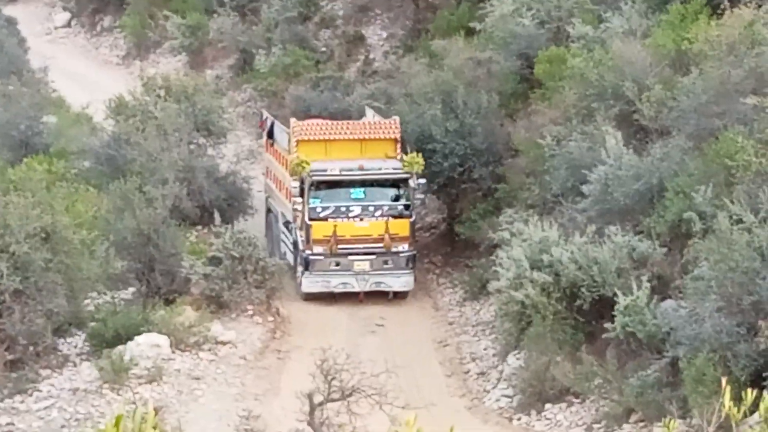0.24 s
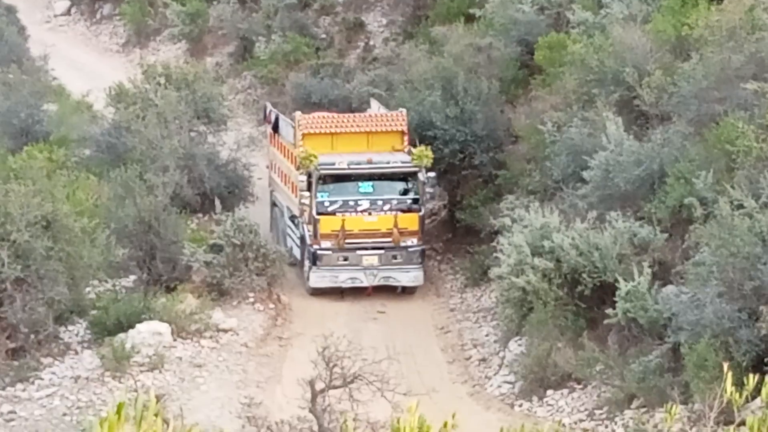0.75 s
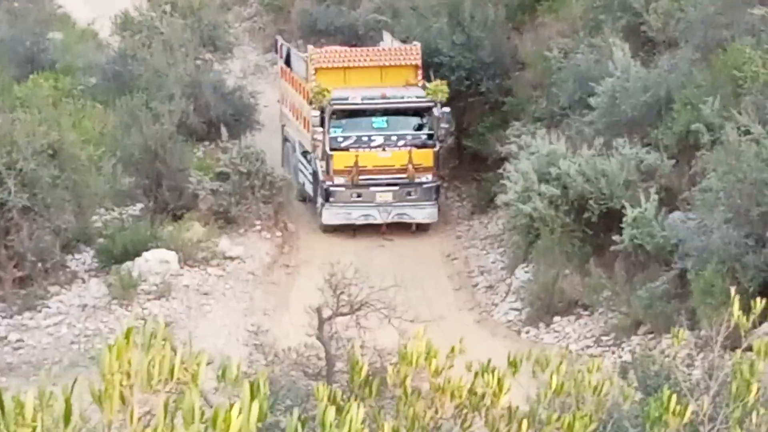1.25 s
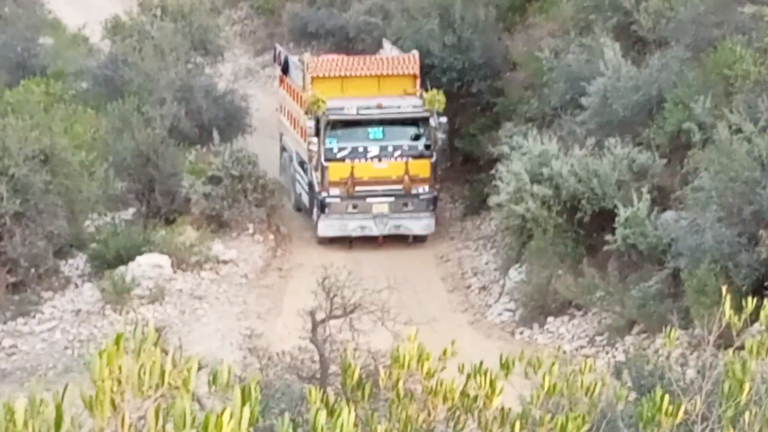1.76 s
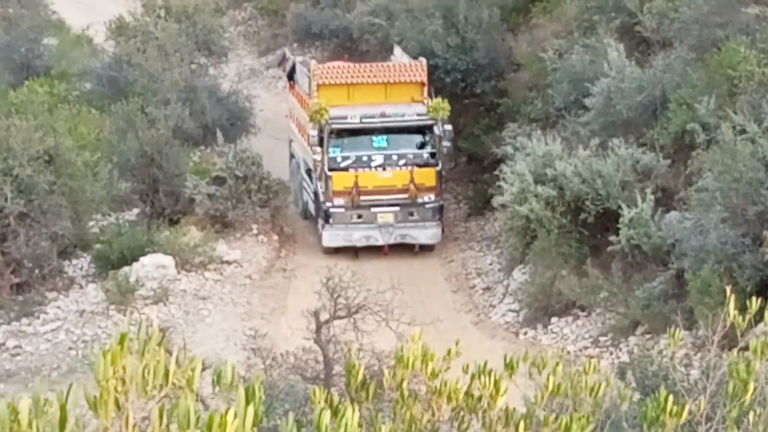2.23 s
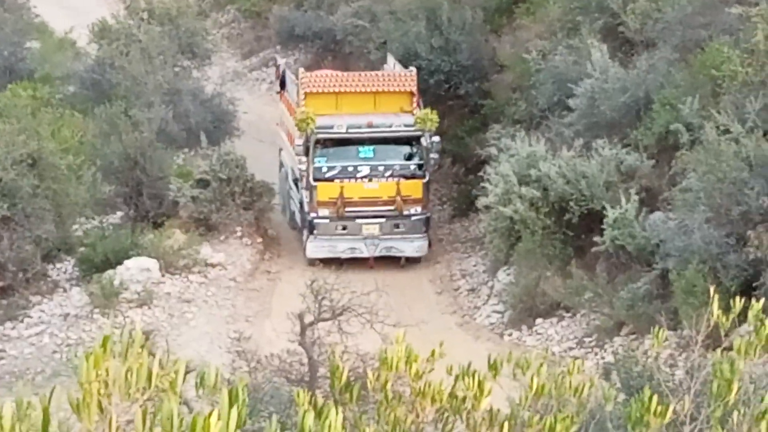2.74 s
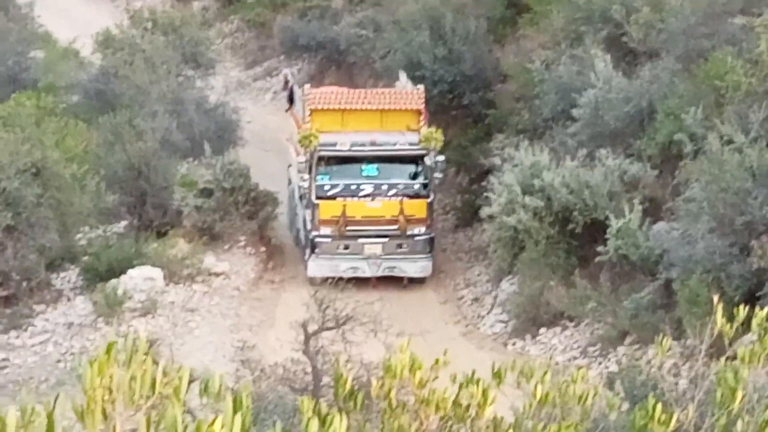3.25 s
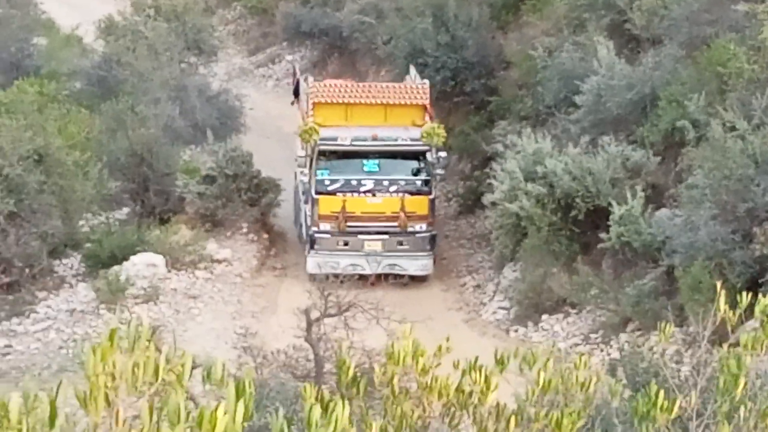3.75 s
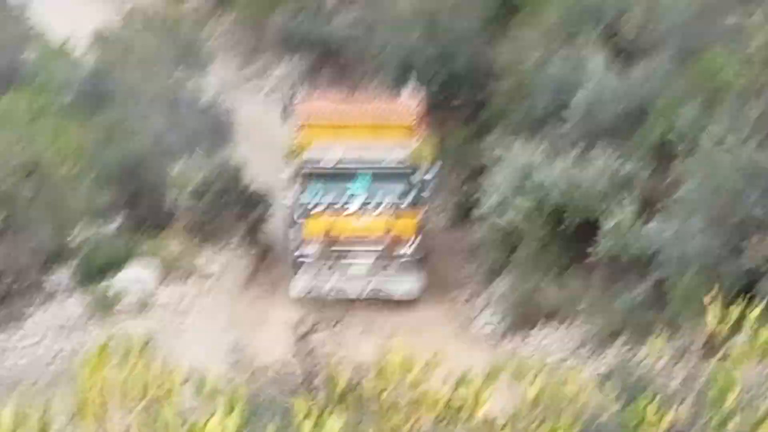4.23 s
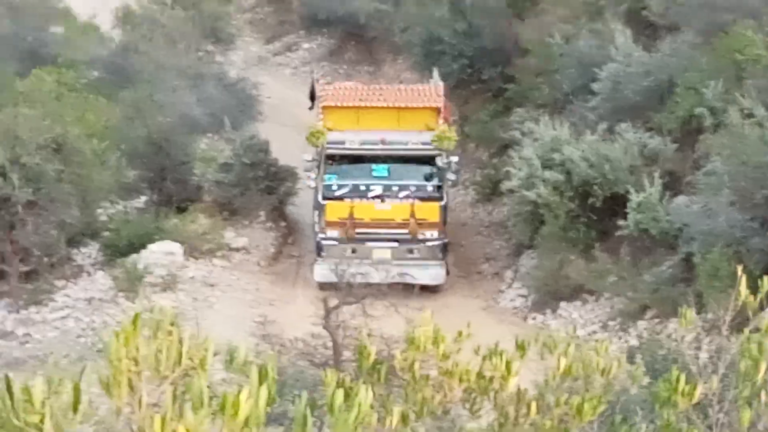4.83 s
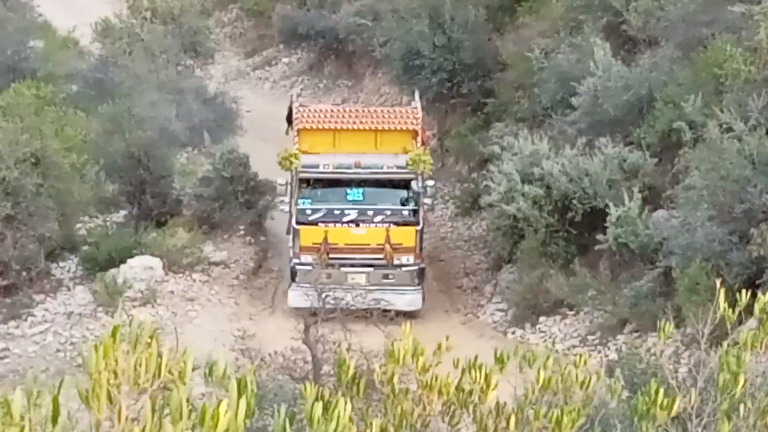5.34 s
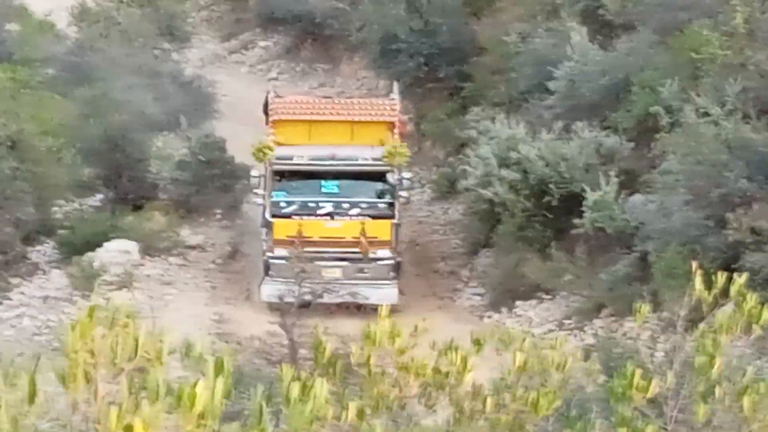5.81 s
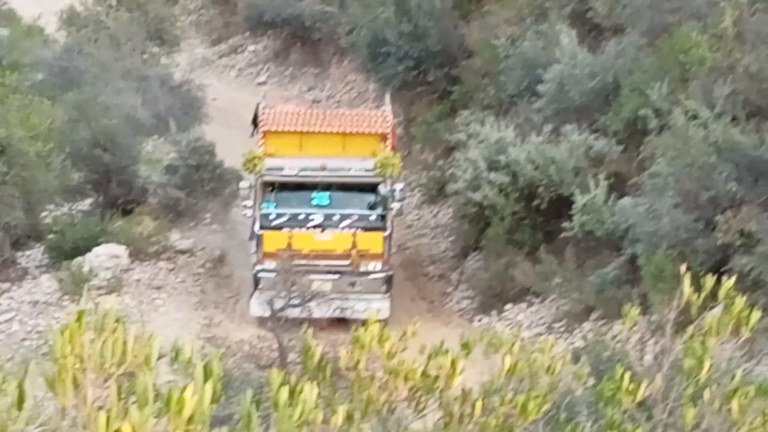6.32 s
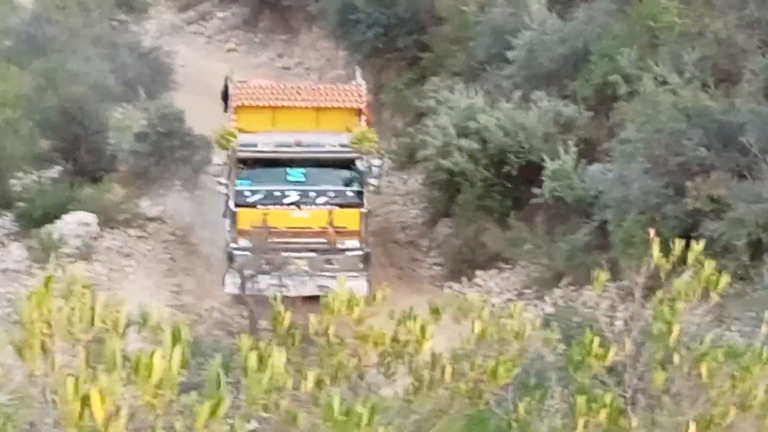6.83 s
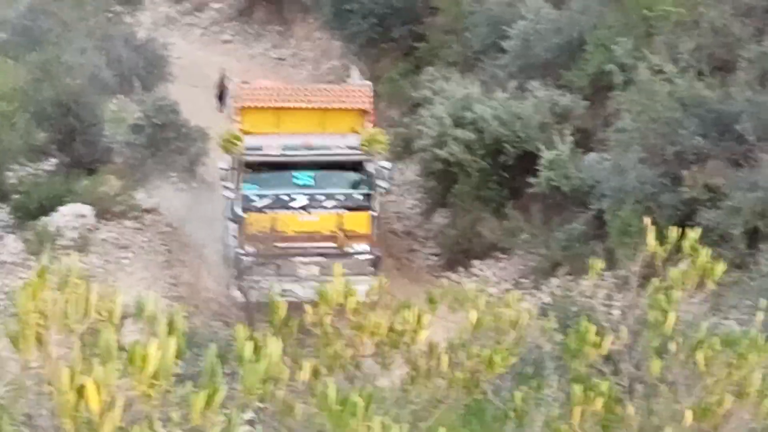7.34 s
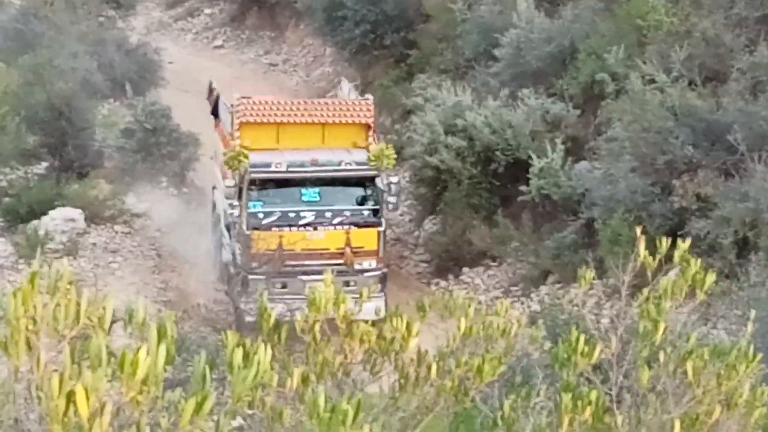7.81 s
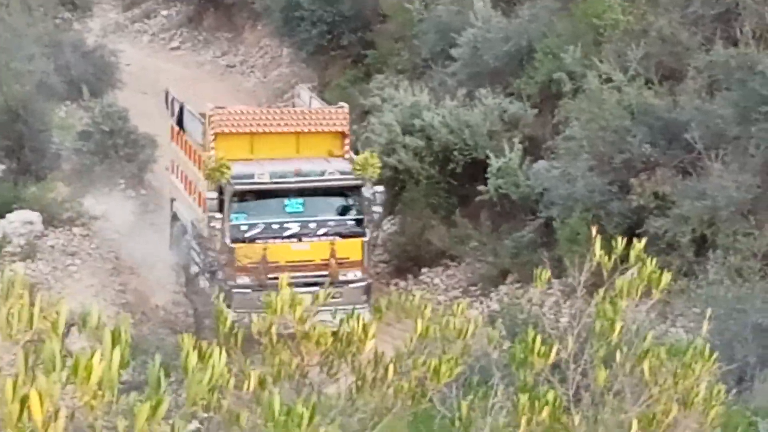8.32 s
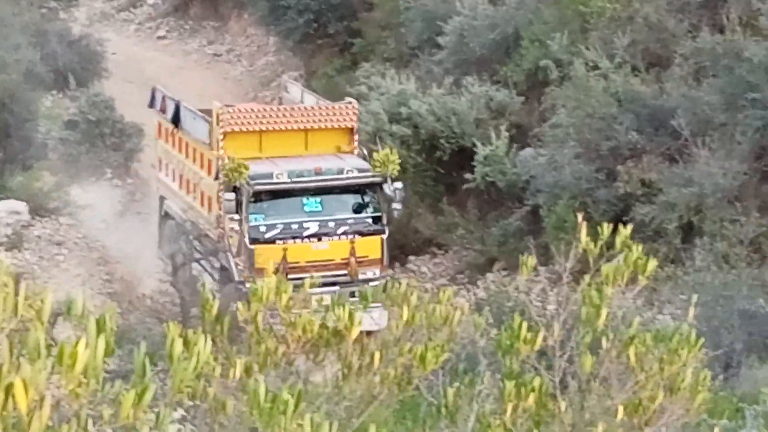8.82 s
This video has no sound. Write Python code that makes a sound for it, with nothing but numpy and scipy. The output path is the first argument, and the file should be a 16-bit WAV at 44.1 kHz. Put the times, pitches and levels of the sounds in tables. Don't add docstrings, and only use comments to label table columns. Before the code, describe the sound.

A phone microphone across a bushy slope catches a steady, throaty truck engine with grainy clatter, faint whine and low ground rumble. Sparse thin bird chirps sit above it. Around the middle the grip changes with a creaking snap and brushing rub, slightly altering the tone of the engine. Dull thumps cluster near the end, followed by two close, brassy horn toots with a brief hillside echo.

```python
import sys
import numpy as np
from scipy import signal
from scipy.fft import rfft, irfft, next_fast_len
from scipy.io import wavfile
from scipy.ndimage import uniform_filter1d, map_coordinates

SR = 44100
rng = np.random.default_rng(int(sys.argv[2]) if len(sys.argv) > 2 else 0)


def voltage_ratio(level):
    return 10 ** (np.asarray(level, float) / 20)


def to_wav(sig):
    pcm = np.clip(np.atleast_2d(sig), -1, 1) * 32767
    pcm = np.round(pcm).astype(np.int16)
    wavfile.write(sys.argv[1], SR, pcm.T)


N = 399987
T = np.arange(N) / SR

# [t/s, firing rate f/Hz, load on upper orders level/dB]
SPEED = [(0, 58.5, -5), (.3, 58.8, -3), (.75, 59.9, 2), (1.1, 59.6, 0), (1.4, 61.3, 1), (2.1, 61.7, 1),
         (2.7, 62.2, 1), (3.2, 61.9, 1), (3.75, 62.6, 1), (4.25, 63.2, 0), (5.7, 63.1, -5), (6.3, 65, -3),
         (6.75, 66.7, 0), (7.6, 66.8, -3), (7.95, 65, -1), (8.2, 61.8, 2), (8.45, 60, 5), (9.07, 59.3, 5)]
# [t/s, level/dB]
NEAR = [(0, -46.5), (.5, -45), (1.2, -44.5), (2, -43), (3.2, -44.5), (4.1, -43.5), (4.6, -44.5),
        (5.8, -43.5), (6.6, -42), (7.3, -40.5), (7.8, -42), (8.8, -42)]
# [mean level/dB, gain per nearness dB/dB, slow drift/dB]
LAYERS = [
    (-47.5, .3, .7),
    (-50, .6, .6),
    (-44, .9, .3),
    (-52, .7, .4),
    (-49, 1.1, 1.2),
]
# [f/Hz, level/dB]
EXHAUST_SPECTRUM = [(71, -47), (120, -6.5), (178, -14.5), (311, -6.5), (394, -13), (664, 2), (900, -12),
                    (1170, -25), (1980, -120)]
# [f/Hz, width/Hz, level/dB]
CAB_MODES = [(650, 80, -2), (695, 36, 3), (728, 22, -4)]
# [f/Hz, level/dB]
BLOCK_SPECTRUM = [(250, -5), (370, -8), (520, -1.5), (700, -14), (839, -9), (1020, -2), (1240, -6),
                  (1330, -3), (1440, -7.5), (1650, -7), (1890, -4), (2150, -12), (2500, -20), (3250, -36),
                  (5500, -120)]
# [f/Hz, level/dB]
CLATTER_SPECTRUM = [(1120, -42), (1900, -3), (2150, -24.5), (2370, -14.5), (3010, -14), (3240, -12.5),
                    (3800, -16), (4660, -16.5), (5710, -16.5), (6700, -14.5), (7520, -23), (8670, -36.5),
                    (11000, -56.5), (14900, -46), (15800, -48)]
SHAFT_ORDERS = [1, 11 / 8, 13 / 8, 2, 17 / 8, 5, 6, 7]
SHAFT_DB = [-54, -56.5, -52, -60.5, -58.5, -58, -58.5, -70]
WHINE_HZ = [1872, 2345]
HORN_HZ = [423.1, 520.6]
HORN_DB = [-21, -27]
LOW_HORN_PARTIALS_DB = [-3, -8, -2, -1.5, 1.5, -12, -7, -5.5, -3.5, -7, -21, -14, -18.5, -12.5]
HIGH_HORN_PARTIALS_DB = [-1.5, -7, -3, 5.5, -5, -2.5, -2, -3, -9, -10, -16, -11, -18, -15]
# [f/Hz, level/dB]
BELL = [(6300, -21), (6800, -24), (7200, -14), (8000, -16), (9300, -33), (12300, -56), (13500, -49),
        (15200, -35)]
# [t/s, held/s, attack/s, level/dB]
TOOTS = [
    (8.87, .109, .006, 1),
    (9.0585, .1, .002, -5),
]
# [f/Hz, t60/s]
HILL_DECAY = [(400, .55), (1300, .3), (2500, .29), (8000, .21)]
# [t/s, comb spacing f/Hz, echo share 0-1]
HAND = [(0, 2120, .45), (4.3, 2120, .45), (4.36, 2120, 0), (4.43, 3800, 0), (4.47, 3150, .62),
        (4.55, 1800, .6), (4.61, 1300, .45), (4.85, 870, .36), (5.1, 810, .33), (6.0, 780, .28),
        (6.42, 820, .33), (6.54, 1100, .33), (6.64, 1480, .36), (7.0, 1820, .38), (7.5, 1960, .36),
        (8.0, 1850, .38), (8.3, 1720, .44), (8.85, 2060, .44)]
# [f/Hz, width/Hz, level/dB]
PORT_MODES = [(6780, 450, -5.5)]
# [f/Hz, level/dB]
SKIN_SPECTRUM = [(1180, -29), (2000, -2), (2160, -11), (2760, -1.5), (3140, -12), (4250, -4), (5010, -15),
                 (6720, 1.5), (8870, -22.5), (14900, -17.5), (15800, -12)]
# [peak t/s, level/dB, 20 dB swell/s, 20 dB fade/s]
STROKES = [
    (4.578, -68, .065, .12),
    (4.872, -46.5, .25, .22),
    (5.07, -57, .6, .04),
    (5.168, -61, .07, .03),
    (6.856, -68.5, .02, .11),
]
# [t/s, bright level/dB, body level/dB]
TICKS = [
    (.678, -52, -60),
    (2.534, -56, -60),
    (4.055, -53, -60),
    (4.3502, -43, -18.5),
    (5.591, -43, -48),
]
# [f/Hz, width/Hz, level/dB]
CASE_MODES = [(3300, 1300, 0), (6500, 1500, -3)]
# [f/Hz, width/Hz, level/dB]
GRIT_MODES = [(7200, 2500, 2), (12500, 7000, 1)]
# [t/s, peak level/dB, f/Hz, t60/s]
BUMPS = [(5.126, -32.5, 125, .12), (7.538, -33.5, 90, 0.14), (7.636, -23.5, 73, 0.12),
         (8.167, -26, 110, 0.07), (8.344, -30, 69.4, .12), (8.386, -16.5, 79.6, 0.078),
         (8.45, -31, 101, .08), (8.515, -32, 127, 0.054), (8.548, -29, 102, 0.057), (8.815, -32, 80, .08),
         (8.845, -30, 95, .07)]
# [t/s, length/s, first f/Hz, last f/Hz, level/dB]
ARCHES = [
    (.074, .038, 4200, 4350, -56),
    (.158, .045, 4300, 4250, -59),
    (.239, .045, 4000, 4300, -55),
    (2.858, .05, 3930, 5000, -56),
    (6.325, .035, 4250, 4250, -63),
]
# [t/s, length/s, first f/Hz, last f/Hz, level/dB]
GLIDES = [(0, .022, 4700, 4650, -58), (.265, .03, 2400, 2350, -61), (.33, .03, 5350, 5400, -63),
          (.197, .026, 5350, 5500, -61), (.207, .04, 2550, 2510, -59), (1.634, .03, 3020, 3090, -54.5),
          (1.835, .015, 2800, 2900, -61), (1.938, .057, 3370, 2750, -58), (2.06, .028, 8900, 6300, -63),
          (2.917, .02, 5250, 4250, -54), (3.888, .024, 4400, 4030, -51), (5.862, .03, 5850, 6150, -60),
          (5.918, .018, 4800, 5900, -60), (5.936, .028, 6000, 6060, -58), (6.012, .03, 5400, 5570, -60),
          (5.982, .029, 3750, 3550, -60), (6.43, .037, 5050, 4900, -62), (6.531, .025, 4750, 4880, -59),
          (7.453, .05, 3250, 3210, -53), (7.58, .04, 5150, 5200, -57.5)]
# [t/s, length/s, first f/Hz, level/dB, rate/(notes/s)]
TRILLS = [
    (1.68, .105, 4400, -51.5, 100),
    (3.91, .125, 4020, -54.5, 48),
]
# [f/Hz, level/dB]
LEAF_SPECTRUM = [(6500, -40), (7800, 3), (9000, -9), (10200, -4.5), (11200, -16), (13000, -40)]
# [f/Hz, level/dB]
RUMBLE_SPECTRUM = [(12, -60), (20, -30), (32, -33), (35, -11), (48, -14), (97, 1), (157, -11.5),
                   (260, -7.5), (340, -23), (570, -120)]

CAB_TURN_AT_S, CAB_TURN_S, CAB_TURN_DB = 5.9, .35, 13
PANEL_HZ, PANEL_WIDTH_HZ, PANEL_LIFT_DB = 418, 6, 17
SHAFT_GROWTH_DB = 3
GEAR_DB, GEAR_DB_PER_HZ, CRUISE_HZ = -54, .9, 62.5
STEEP_S, STEEP_SPAN_S, GEAR_LIFT_DB = 5.7, .85, 4
UPPER_DB, UPPER_LIFT_DB = -70, 13
VALVE_CLOSE_S = .024
REGRIP_S = 4.35
CREAK_S, CREAK_LENGTH_S, SLIPS, QUICKEN = 4.3205, .0278, 15, .8
CREAK_DB, CREAK_RISE_DB, CREAK_SCATTER_DB, CREAK_BODY_DB = -46, 11, 3.5, -8
ARCH_HZ, BEND_HZ = 320, 30
SCRUB_DB, SHIELD_DB = -75, -7
FUMBLE_S, FUMBLE_SPAN_S, FUMBLE_DB = 8, .65, 3.5


def unit(x):
    return x / np.sqrt(np.mean(x ** 2) + 1e-20)


def along(points, hz):
    f, v = np.transpose(points)
    return np.interp(np.log(hz + 1), np.log(f + 1), v)


def curves(rows):
    s, *cols = np.transpose(rows)
    return [np.interp(T, s, c) for c in cols]


def wobble(rate_hz):
    coarse = T[::32]
    knots = rng.standard_normal(int(N * rate_hz / SR) + 4)
    return np.interp(T, coarse, map_coordinates(knots, [coarse * rate_hz]))


def white():
    return rng.standard_normal(N)


def patchy(depth_db):
    z = signal.stft(rng.standard_normal(N, dtype=np.float32), nperseg=512)[2]
    field = rng.standard_normal(z.shape, dtype=np.float32)
    field = uniform_filter1d(field, size=5, axis=0)
    field = uniform_filter1d(field, size=10, axis=1)
    return signal.istft(z * voltage_ratio(depth_db * unit(field)), nperseg=512)[1][:N]


def filtered(x, response):
    m = next_fast_len(N + SR // 2)
    return irfft(rfft(x, m) * response(np.fft.rfftfreq(m, 1 / SR)), m)[:N]


def coloured(x, spectrum):
    return unit(filtered(x, lambda hz: voltage_ratio(along(spectrum, hz))))


def modes(table):
    return lambda f: sum(voltage_ratio(db) * 1j * f * w / (c * c - f * f + 1j * f * w) for c, w, db in table)


def layer_db(index):
    mean_db, grows, drift_db = LAYERS[index]
    near_db = curves(NEAR)[0]
    return mean_db + grows * (near_db - near_db.mean()) + drift_db * wobble(3)


def engine():
    firing_hz = uniform_filter1d(curves(SPEED)[0], size=SR // 4)
    turns = np.cumsum(firing_hz) / SR
    return firing_noise(turns) + shaft_tones(firing_hz, turns) + whines(firing_hz)


def firing_noise(turns):
    exhaust_db, drone_db, block_db, clatter_db = map(layer_db, range(4))
    drone_db += CAB_TURN_DB * np.tanh((T - CAB_TURN_AT_S) / CAB_TURN_S) / 2
    count = turns.astype(int)
    size_db = 4 * (-1.) ** count
    size_db += 1.8 * rng.standard_normal(count[-1] + 1)[count]
    pulse = voltage_ratio(size_db) * np.exp(-3 * (turns % 1))
    load_db = 0.24 * wobble(5) + 0.66 * wobble(9)

    exhaust = coloured((1 + 0.44 * pulse) * patchy(2.2), EXHAUST_SPECTRUM)
    drone = unit(filtered((1 + 0.43 * pulse) * white(), lambda f: modes(CAB_MODES)(f) ** 2))
    block = coloured((1 + 0.24 * pulse) * patchy(1.6), BLOCK_SPECTRUM)
    clatter = coloured((1 + 0.27 * pulse) * patchy(1.3), CLATTER_SPECTRUM)

    sound = voltage_ratio(exhaust_db + load_db + 0.62 * wobble(9.7)) * exhaust
    sound += voltage_ratio(drone_db + load_db + 1.3 * wobble(18) - 4) * drone
    sound += voltage_ratio(block_db + load_db) * block
    return sound + voltage_ratio(clatter_db + 0.45 * load_db) * clatter


def shaft_tones(firing_hz, turns):
    sound = np.zeros(N)
    strain_db = curves(SPEED)[1]
    for order, db in zip(SHAFT_ORDERS, SHAFT_DB):
        detune = (order * firing_hz - PANEL_HZ) / PANEL_WIDTH_HZ
        lift = 1 + voltage_ratio(PANEL_LIFT_DB) / (1 + detune ** 2)
        growth_db = SHAFT_GROWTH_DB * (order < 4) * (T / T[-1] - .5)
        level_db = db + 2 + growth_db + (order > 4) * strain_db + 1.6 * wobble(4.6)
        sound += lift * voltage_ratio(level_db) * np.sin(2 * np.pi * order * turns + 0.36 * wobble(5))
    return sound


def whines(firing_hz):
    sound = np.zeros(N)
    steep = np.exp(-((T - STEEP_S) / STEEP_SPAN_S) ** 4)
    gear_db = GEAR_DB + GEAR_LIFT_DB * steep + GEAR_DB_PER_HZ * (firing_hz - CRUISE_HZ) + 1.5 * wobble(4)
    upper_db = UPPER_DB + UPPER_LIFT_DB * steep + 2.5 * wobble(4)
    for hz, db, blur_rad in zip(WHINE_HZ, (gear_db, upper_db), (1.05, 3)):
        sound += voltage_ratio(db + 2.6 * wobble(17)) * np.sin(2 * np.pi * hz * T + blur_rad * wobble(30))
    return sound


def horn():
    start = round(8.8 * SR)
    t, sound = T[start:], np.zeros(N)

    def drift(count):
        return np.interp(t, np.linspace(t[0], t[-1], num=count), rng.standard_normal(count))

    for hz, level_db, partials_db in zip(HORN_HZ, HORN_DB, (LOW_HORN_PARTIALS_DB, HIGH_HORN_PARTIALS_DB)):
        reed = 2 * np.pi * hz * t + 0.13 * drift(30)
        for k in range(1, int(15400 / hz) + 1):
            db = partials_db[k - 1] if k <= len(partials_db) else along(BELL, k * hz)
            lag = rng.normal(0, 0.7) + 0.16 * np.sqrt(k) * drift(20)
            sound[start:] += voltage_ratio(level_db + db + .9 + 2.4 * drift(24)) * np.cos(k * reed + lag)
    air = voltage_ratio(-31.5) * coloured(white(), [(300, -40), (1200, 0), (3500, -3), (7000, -18),
                                          (12000, -36), (15500, -36)])
    return valve() * (sound + air)


def valve():
    pressure = np.zeros(N)
    for s, held_s, attack_s, db in TOOTS:
        rise = (1 - np.exp(-np.clip(T - s, 0, None) / attack_s)) ** 2
        fall = np.exp(-(np.clip(T - s - held_s, 0, None) / VALVE_CLOSE_S) ** 3)
        pressure += voltage_ratio(db) * rise * fall
    return pressure


def hills(x):
    hz, t, z = signal.stft(rng.standard_normal(SR // 2), SR, nperseg=256)
    decay = voltage_ratio(-60 * t / along(HILL_DECAY, hz)[:, None])
    tail = signal.istft(z * decay, SR, nperseg=256)[1]
    return signal.fftconvolve(np.pad(x, (500, 0)), tail / np.linalg.norm(tail))[:N]


def handling():
    return rubs() + ticks() + bumps()


def rubs():
    strokes_db = [db - 20 * np.maximum((s - T) / swell_s, (T - s) / fade_s)
                  for s, db, swell_s, fade_s in STROKES]
    rub_db = np.max(strokes_db, axis=0)
    return voltage_ratio(rub_db + 10.5 + 0.66 * wobble(60)) * coloured(patchy(1.5), SKIN_SPECTRUM)


def ticks():
    s, bright_db, body_db = np.vstack([TICKS, creak()]).T
    at = np.round(s * SR).astype(int)
    k = np.arange(48)
    scratch = rng.standard_normal((len(at), 48)) * voltage_ratio(bright_db[:, None] - 4 - .4 * k)
    grit = np.bincount((at[:, None] + k).ravel(), scratch.ravel(), N)
    knocks = np.bincount(at, voltage_ratio(body_db + 15), N)
    body = filtered(knocks, lambda f: modes(CASE_MODES)(f) * modes([(4000, 5500, 1)])(f))
    return filtered(grit, modes(GRIT_MODES)) + body


def creak():
    u = np.linspace(0, 1, SLIPS)
    chance = rng.standard_normal((SLIPS, 3))
    s = CREAK_S + CREAK_LENGTH_S * u ** QUICKEN + .0003 * chance[:, 0]
    rise_db = CREAK_DB + CREAK_RISE_DB * u
    bright_db = rise_db + CREAK_SCATTER_DB * chance[:, 1]
    body_db = rise_db + CREAK_BODY_DB + CREAK_SCATTER_DB * chance[:, 2]
    return np.transpose([s, bright_db, body_db])


def bumps():
    sound = np.zeros(N)
    t = np.arange(SR // 5) / SR
    for s, db, hz, t60_s in BUMPS:
        phase = 2 * np.pi * hz * (t + .007 * (1 - np.exp(-t / .009)))
        swing = np.cos(phase + 2.4)
        swing += 0.28 * np.sin(2.5 * phase) * voltage_ratio(-60 * t / 0.13)
        swing += 0.11 * np.sin(4.18 * phase) * voltage_ratio(-60 * t / 0.072)
        level = voltage_ratio(db + 7 - 60 * t / max(t60_s, .02)) * (1 - np.exp(-t / 0.0054))
        sound[round(s * SR):][:len(t)] += level * swing
    return sound


def birds():
    sound = np.zeros(N)
    whistles = [(*a, ARCH_HZ) for a in ARCHES] + [(*g, BEND_HZ) for g in GLIDES]
    for s, length_s, first_hz, last_hz, db, arch_hz in whistles:
        u = np.linspace(0, 1, round(length_s * SR))
        hz = first_hz + (last_hz - first_hz) * u + 4 * arch_hz * u * (1 - u)
        sound[round(s * SR):][:len(u)] += whistle(hz, voltage_ratio(db + 5) * np.sin(np.pi * u) ** 0.49)
    for s, length_s, first_hz, db, rate in TRILLS:
        u = np.linspace(0, 1, round(length_s * SR))
        note = u * length_s * rate % 1
        hz = first_hz + rate * (9.1 * (.5 - note) - 5.6 * u ** .7)
        level = voltage_ratio(db + 5.5) * np.sin(np.pi * u) ** 0.26 * np.sin(np.pi * note) ** 2
        sound[round(s * SR):][:len(u)] += whistle(hz, level)
    return sound


def whistle(hz, level):
    knots = np.arange(0, SR // 4, 250)
    ruffle_db = 3 * np.interp(np.arange(len(hz)), knots, rng.standard_normal(len(knots)))
    return level * voltage_ratio(ruffle_db) * np.sin(2 * np.pi * np.cumsum(hz) / SR)


def scrub():
    level_db = SCRUB_DB + SHIELD_DB * (T > REGRIP_S) + 1.5 * wobble(1.5) - 2.5
    flicker = voltage_ratio(2.5 * wobble(14) + 1.5 * wobble(40))
    return voltage_ratio(level_db) * unit(flicker * coloured(patchy(2.5), LEAF_SPECTRUM))


def rumble():
    fumble_db = FUMBLE_DB * np.exp(-((T - FUMBLE_S) / FUMBLE_SPAN_S) ** 4)
    lumps = voltage_ratio(1.9 * wobble(14)) * coloured(patchy(2.6), RUMBLE_SPECTRUM)
    return voltage_ratio(layer_db(4) + fumble_db) * unit(lumps)


def past_hand(far):
    spacing_hz, share = curves(HAND)
    echo = map_coordinates(far, [np.arange(N) - SR / spacing_hz], order=3)
    echo = filtered(echo, lambda hz: hz ** 2 / (hz ** 2 + 600 ** 2) / (1 + (hz / 8000) ** 4))
    heard = (far - share * echo) / np.sqrt(1 + share ** 2)
    freed = np.clip((T - REGRIP_S) / .1, 0, 1)
    return heard + freed * filtered(heard, modes(PORT_MODES))


def scene():
    calls = horn() + birds()
    far = engine() + calls + voltage_ratio(-12) * hills(calls)
    return (past_hand(far) + scrub() + rumble() + handling())[None]


def top_cut(x):
    return signal.sosfilt(signal.butter(12, 16000, fs=SR, output="sos"), x)


def record(dry):
    hiss = voltage_ratio(-77) * coloured(white(), [(2000, -1), (9000, -1.5), (15500, -5), (16000, -60)])
    soft = dry[0] / (1 + np.abs(dry[0] / .95) ** 4) ** (1 / 4)
    heard = filtered(soft + hiss, lambda hz: (hz < 15550) * hz ** 4 / (hz ** 4 + 36 ** 4))
    return top_cut(heard[None])


dry = scene()
out = record(dry)
to_wav(out)
```